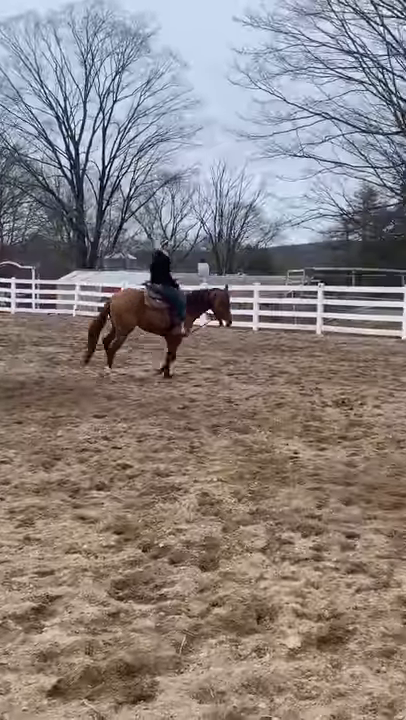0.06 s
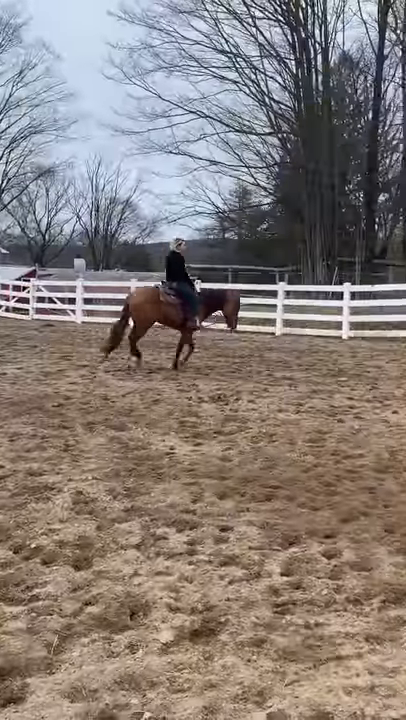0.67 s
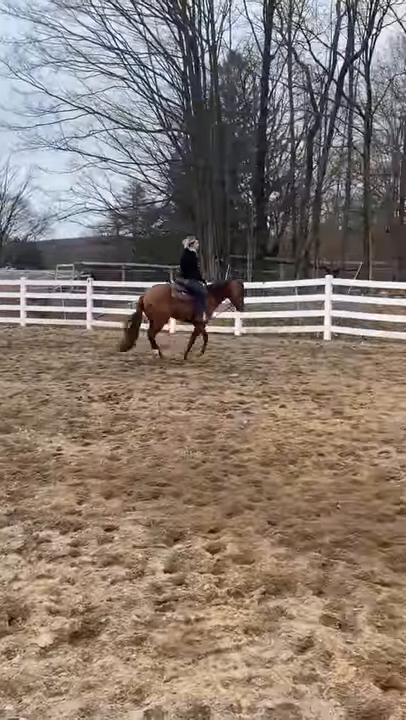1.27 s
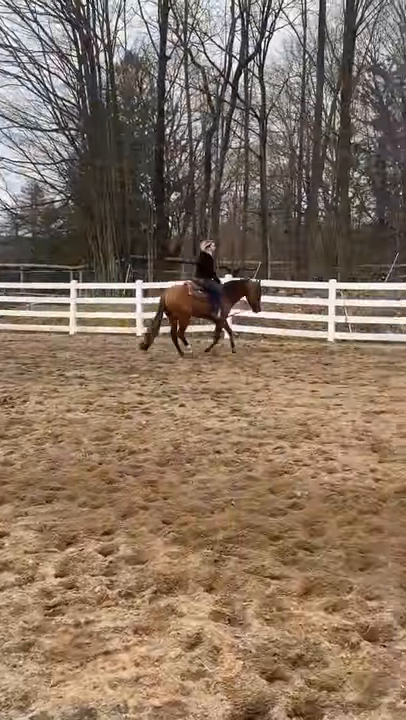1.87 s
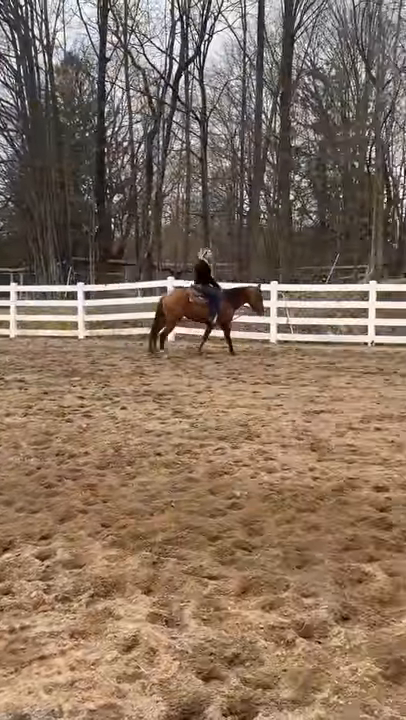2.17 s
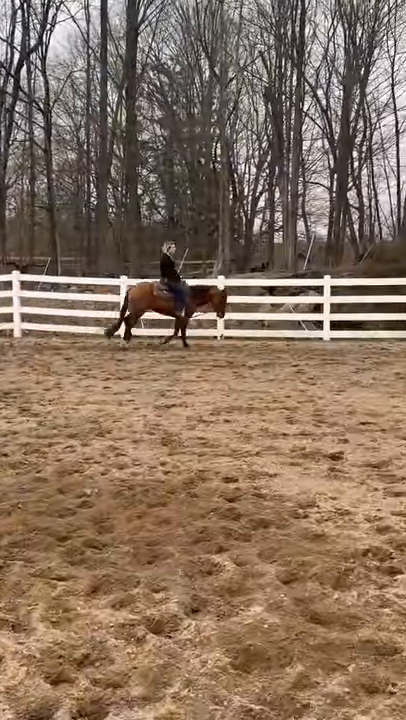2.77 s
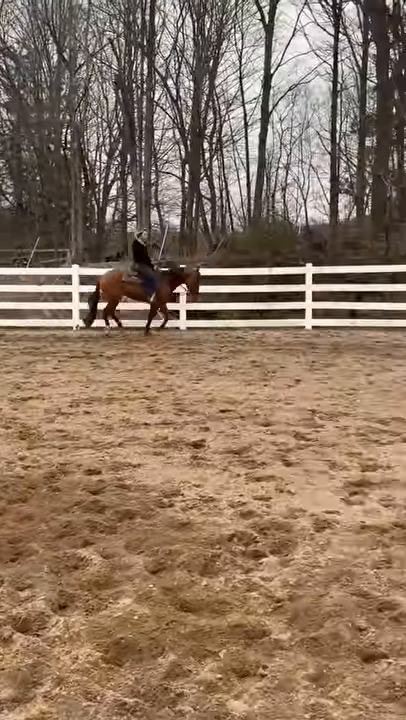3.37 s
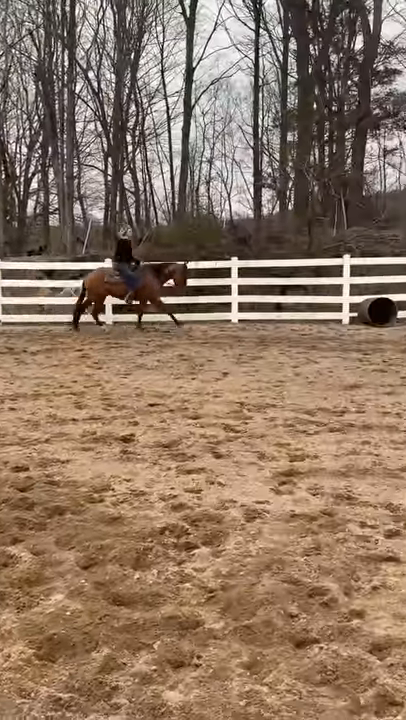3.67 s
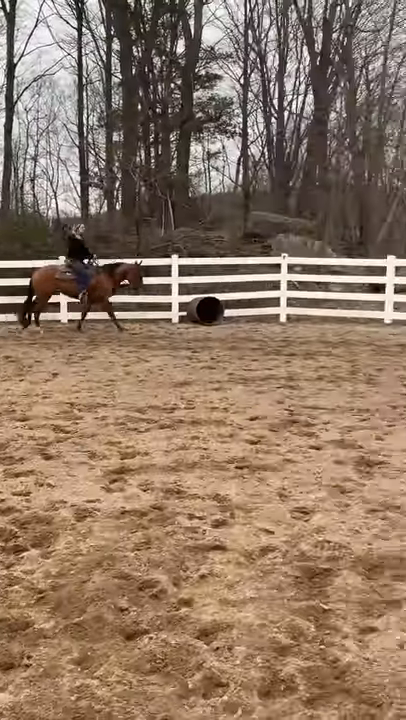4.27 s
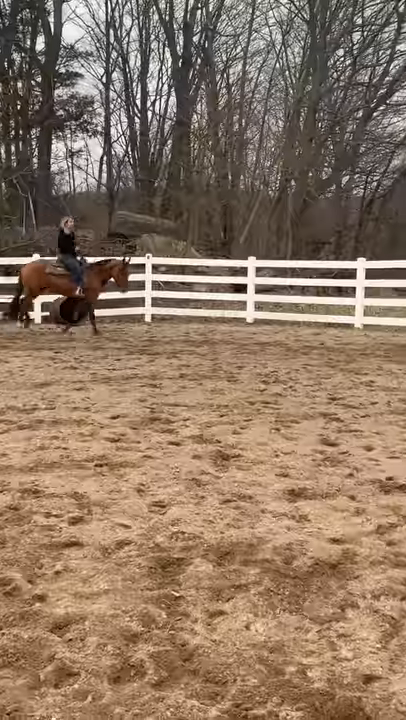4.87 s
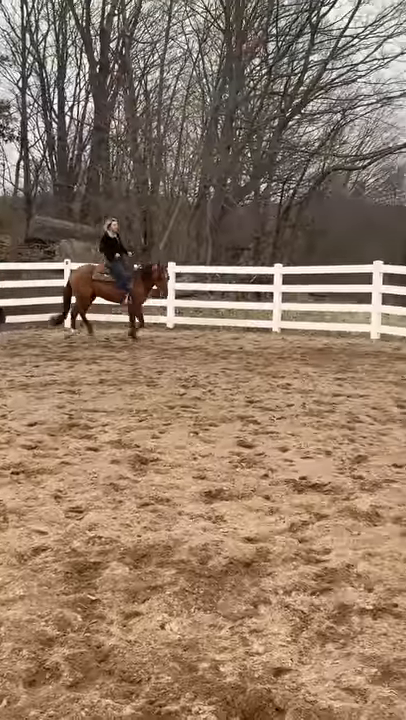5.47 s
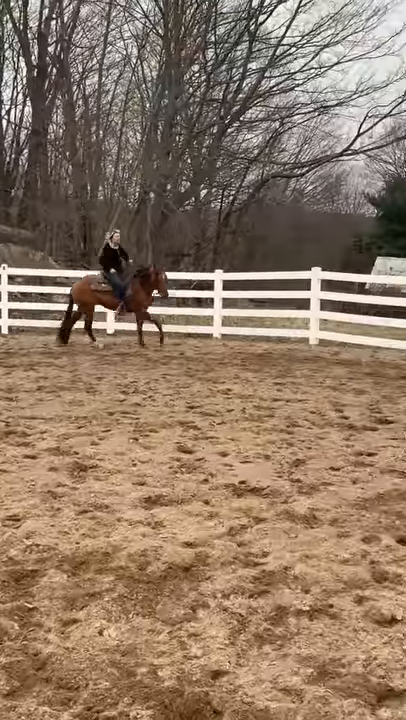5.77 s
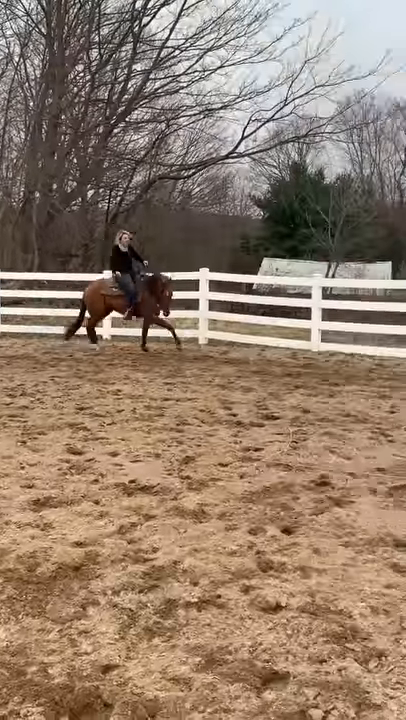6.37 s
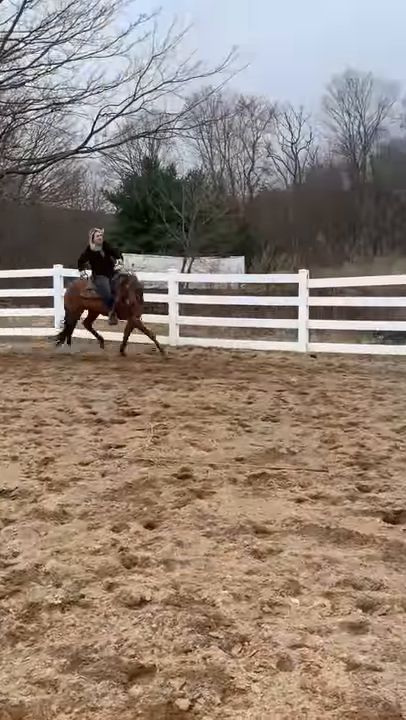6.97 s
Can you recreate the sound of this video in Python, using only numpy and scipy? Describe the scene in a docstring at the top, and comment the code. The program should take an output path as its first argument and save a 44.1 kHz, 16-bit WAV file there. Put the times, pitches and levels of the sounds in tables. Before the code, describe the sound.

A deep, throbbing engine hum idles steadily over the faint, dull hoofbeats of a horse loping on sand, with light clothing ticks.

```python
"""Loping horse and idling engine

A horse lopes on soft sand across an outdoor arena: its impacts give dull thuds, small knocks, thin clinks of
steel and sprays of sand. The uneven firing of an unseen eight-cylinder engine makes a deep throbbing hum whose
balance shifts as the microphone turns. Close by, clothing and its fittings tick, chink and rustle; a light
breeze and distant air lie underneath."""
import sys
import numpy as np
from scipy import signal
from scipy.fft import rfft, irfft, next_fast_len
from scipy.io import wavfile
from scipy.ndimage import uniform_filter1d, map_coordinates

SR = 44100
rng = np.random.default_rng(int(sys.argv[2]) if len(sys.argv) > 2 else 0)


def master_out(mix):
    """Clip the mix to full scale and print it as 16-bit PCM to the path in sys.argv[1]."""
    frames = np.transpose(np.atleast_2d(mix))
    ceiling = np.clip(frames, -1, 1)
    pcm = np.round(ceiling * 32767).astype(np.int16)
    wavfile.write(sys.argv[1], SR, pcm)


N = 309141

# the heaviest hoof of each stride, about two a second:
# (time [s], thud level [dB], its sand [dB], sand of the next hoof [dB], patter length [s])
STRIDES = [(0.412, -25, -62.5, -76.5, .2), (0.968, -50, -68.5, -73, 0.21), (1.5, -47, -78.5, -77, 0.23),
           (2.028, -50, -71.5, -79, 0.29), (2.568, -17, -65.5, -70.5, 0.29), (3.112, -23.5, -67, -89, 0.19),
           (3.627, -15.5, -64, -75.5, 0.3), (4.151, -14, -67.5, -76, 0.31), (4.686, -47, -72.5, -72, 0.29),
           (5.244, -19.5, -61.5, -71.5, 0.2), (5.754, -20, -70.5, -73.5, 0.44), (6.182, -38, -72, -72, 0.3),
           (6.687, -26, -70.5, -61, 0.45)]
# hooves on firm ground: (time [s], body peak [dB], clack peak [dB], grit level [dB], body t60 [s])
KNOCKS = [(0.4495, -41.5, -63, -55, .025), (0.968, -42, -57, -63, .03), (2.481, -44, -68, -76, 0.025),
          (2.5899, -37, -56, -54, 0.048), (2.643, -45.5, -67, -76, 0.041), (3.1136, -35, -55, -55.5, 0.026),
          (3.147, -41.5, -54, -59, 0.045), (3.161, -40, -54.5, -63, 0.026), (4.186, -36, -50, -71, 0.029),
          (4.688, -40, -55, -67.5, 0.029), (5.248, -31.5, -51, -53.5, 0.041),
          (5.595, -41.5, -49, -67.5, 0.039), (5.756, -43, -61, -70, 0.066),
          (6.182, -39.5, -46.5, -60, 0.037), (6.407, -41, -50, -58, 0.022), (6.429, -38, -53, -57, 0.057),
          (6.687, -35.5, -48.5, -68, 0.036), (6.849, -63, -49.5, -63, 0.033), (6.957, -40, -66, -57, .025)]
# modes of a knock's dull body and of the hoof's hard rim: (frequency [Hz], level [dB])
BODY_MODES = [(570, -1), (690, -1.5), (820, 1), (1000, -5), (1220, -3), (1560, -2), (1950, -4.5)]
RIM_MODES = [(2060, -6.5), (2370, -0.5), (2680, 2.5), (3900, -7.5)]
# modes of the steel: (frequency [Hz], level [dB], t60 [s])
STEEL_MODES = [(3960, 1, 0.15), (5030, -8, 0.11), (6700, -12.5, 0.12), (10500, -5.5, 0.14),
               (11530, -1, 0.058), (14430, -12, .13)]
# footfalls that ring the steel: (time [s], level [dB])
STEEL_CLINKS = [(2.5887, -57.5), (3.114, -57), (4.1864, -68), (5.5962, -64), (6.183, -60), (6.6857, -61)]

# engine speed: (time [s], four-stroke cycle rate [Hz])
CYCLE_RATE = [(0, 6.76), (1, 6.865), (2.4, 6.899), (2.8, 6.816), (3.8, 7.051), (4.4, 6.98), (5.4, 7.118),
              (6.7, 7.087), (7, 7.111)]
# arrival of an engine cycle over each of two paths: (first path [s], second path [s])
CYCLE_ARRIVALS = [.103, .058]
# exhaust lines: (order [multiple of the cycle rate], first path level [dB], second path level [dB])
EXHAUST_LINES = [(7, -57, -57), (9, -49, -52), (10, -58, -54), (11, -58, -55), (12, -40, -52),
                 (13, -33, -48), (14, -50, -47), (15, -35, -40.5), (16, -29.7, -34), (17, -47, -49),
                 (18, -57, -60), (19, -56, -64), (22, -65, -53), (23, -53, -53), (24, -63, -62),
                 (25, -59, -60), (26, -60, -57)]
# the microphone turns between the paths: (time [s], second path over first [dB], hum gain [dB])
MICROPHONE_TURN = [(0, -34.5, 4), (2.6, -21, 3.5), (3.2, -12.5, 0.5), (3.5, -0.5, 2), (3.75, 21, 3),
                   (4.1, 11, 0), (4.52, 33, 7), (4.7, 10, 1.5), (7, 26.5, 4.5)]

# clear ticks of clothing and straps: (time [s], level [dB], pitch [Hz], half width [octaves], t60 [s])
CLOTH_TICKS = [(0.197, -57, 10700, 1.6, .025), (0.2377, -55, 10600, .2, 0.017),
               (0.334, -66, 11500, .6, .025), (0.3713, -41.5, 10200, 0.28, .013),
               (0.4505, -46.5, 6000, 2.9, 0.016), (0.4672, -48, 5600, 1.1, .012),
               (0.619, -48, 6400, 0.2, 0.01), (0.738, -60.5, 7000, 2, 0.018),
               (0.85, -53.5, 10100, 0.21, 0.037), (1.0065, -48, 6300, .5, .014),
               (1.04, -62.5, 6100, 0.12, 0.037), (1.288, -57, 5800, .9, 0.013),
               (1.366, -56, 6200, 0.58, .025), (1.697, -49.5, 6500, .5, .01),
               (1.8165, -51, 11500, 1.2, .008), (1.839, -45.5, 8000, 1.3, .009),
               (1.8527, -38, 6400, .55, 0.0047), (2.117, -50.5, 6900, 0.23, 0.0073),
               (2.209, -50, 5000, .7, 0.0072), (2.405, -64.5, 10500, .12, .025),
               (2.849, -57.5, 6000, 1.4, 0.0089), (3.2668, -52, 7500, 1.4, 0.023),
               (3.539, -58, 13500, 0.47, 0.026), (3.636, -60, 6400, .2, .018),
               (4.167, -52, 4400, .35, 0.02), (4.178, -49.5, 6630, 0.31, 0.0098),
               (4.31, -66, 5200, 0.22, 0.029), (4.387, -58, 9300, .4, 0.015),
               (4.908, -61, 3500, 0.42, 0.014), (5.0755, -57.5, 10450, .9, .025),
               (5.223, -53, 4000, 0.21, .022), (5.2825, -48, 6500, 0.67, 0.0084),
               (6.046, -61, 6000, 0.8, .01), (6.1275, -54, 5500, 1.2, 0.011), (6.184, -47, 9000, 1.1, .01),
               (6.3675, -57, 5000, 1.2, .015), (6.381, -56, 7000, 1, .015), (6.6865, -51, 5800, 1.2, 0.017),
               (6.8, -57, 6360, 1, 0.039), (6.875, -53, 7000, 1.2, .014), (6.956, -53, 5660, 0.39, .018)]
# rubs of cloth and scrapes of a sleeve: (time [s], level [dB], length [s])
CLOTH_RUBS = [(.245, -68, 0.18), (.47, -71, 0.17), (.83, -64, 0.029), (1.01, -75.5, 0.1),
              (1.355, -65, 0.05), (1.835, -61, 0.093), (4.17, -76, 0.046), (6.368, -59.5, 0.032),
              (5.027, -74, 0.054), (6.85, -68, 0.13)]
SLEEVE_SCRAPES = [(5.873, -47.5, 0.033), (6.5005, -47.5, 0.022)]
# chinks of small metal fittings: (time [s], level [dB], pitch [Hz])
FITTING_CHINKS = [(0.542, -54, 4110), (1.698, -67, 6330), (1.885, -55, 3980), (2.116, -67, 6750),
                  (2.305, -60.5, 4020), (3.965, -61.5, 10300), (4.179, -67, 6800), (5.596, -68, 5030)]

# gusts at the microphone: (time [s], rise [dB], half length [s])
GUSTS = [(4.497, 4, .2), (6.28, 7.5, .2), (6.9, 7, 0.16)]
# the far rush and its hollow note: (time [s], level [dB])
RUSH_LEVEL = [(0.0, -53), (1.05, -53.5), (1.13, -54), (2.79, -54), (3.45, -53.5), (4.02, -55),
              (5.11, -54.5), (5.48, -53), (5.58, -53.5), (7.01, -53.5)]
HOLLOW_NOTE_LEVEL = [(0, -63.5), (1.4, -61), (2.1, -59), (3.1, -61.5), (4.2, -67), (7, -68)]

# noise spectrum of each source: (frequency [Hz], relative spectral density [dB])
GRIT_SPECTRUM = [(900, -18), (2000, -3.5), (2800, -3.5), (4000, 9.5), (5500, -14.5), (7000, -19),
                 (15000, -29)]
SAND_SPECTRUM = [(700, -10), (1600, 4.5), (2800, 4), (4100, 1.5), (5200, -8), (7000, -16), (11000, -15.5),
                 (15500, -31)]
EXHAUST_SPECTRUM = [(40, -21), (62, -11), (80, -6), (105, 2), (135, -8), (170, -8), (210, -16), (270, -21),
                    (400, -29), (700, -68.5)]
CLOTH_SPECTRUM = [(700, -19), (1900, -3), (3000, 0), (5000, -0.5), (6800, -5), (8500, -6.5), (11000, -6),
                  (15000, -18.5)]
SLEEVE_SPECTRUM = [(900, -19), (1600, -9), (2050, 3), (2700, -7), (3600, -12), (5100, 2.5), (5900, -7),
                   (6700, -2.5), (8300, -13), (10000, -9), (12000, -32), (15000, -25)]
BREEZE_SPECTRUM = [(20, -27), (32, -11.5), (46, 0.5), (60, 4.5), (85, -10), (140, -31.5), (300, -75.5)]
AIR_SPECTRUM = [(150, -13.5), (300, -7.5), (460, -7), (600, 2.5), (800, 0), (1100, 0), (1600, -5),
                (2100, -14.5), (3300, -20.5), (4800, -34), (7000, -36.5), (11000, -35), (15500, -50)]
# likeness of left and right in every stereo noise: (frequency [Hz], coherence [ratio])
COHERENCE = [(100, 0.95), (290, 0.97), (450, 0.72), (700, 0.28), (1400, 0.53), (2500, 0.027), (5000, 1),
             (15000, 0.98)]


def hoof_thuds(thud_hz=215, sink=0.38, t60=0.038, attack_s=0.011, gain_db=5):
    """Damped impact: a hoof gives the ground a short push whose pitch sinks as the sand yields."""
    track, t = np.zeros(N), np.arange(SR // 8) / SR
    glide = 1 + sink * (2 * np.exp(-t / 0.011) - 1)
    onset = (1 - np.exp(-t / attack_s)) ** 2
    for (s, db, *_), detune in zip(STRIDES, rng.standard_normal(len(STRIDES))):
        hz = thud_hz * (1 + 0.033 * detune) * glide
        add(track, s, amp(db + gain_db) * onset * decay(t, t60) * np.sin(2 * np.pi * np.cumsum(hz) / SR))
    return track


def hoof_knocks(attack_s=0.00017, grit_t60=0.044, echo_db=-25, echo_t60=0.3):
    """Modal ringing: a woody body and a rim clack, with a crunch of grit the trees reflect faintly."""
    rings, grit_level, t = np.zeros((2, N)), np.zeros(N), np.arange(SR // 6) / SR
    onset = 1 - np.exp(-t / attack_s)  # sand cushions the blow
    crunch = onset * (decay(t, grit_t60) + amp(echo_db) * decay(t, echo_t60))

    def ring(modes, t60, scatter, side_radians):
        """Superposed modes, peak 1: each footfall meets new ground, so pitches and phases vary."""
        hz, mode_db = np.transpose(modes)[:, :, None]
        detune, start, *sides = rng.standard_normal((4, len(hz), 1))
        phase = 2 * np.pi * (hz * (1 + scatter * detune) * t + start) + side_radians * np.array(sides)
        pair = onset * decay(t, t60) * np.sum(amp(mode_db) * np.sin(phase), axis=1)
        return pair / np.abs(pair).max()

    for s, body_db, clack_db, grit_db, body_t60 in KNOCKS:
        body = amp(body_db) * ring(BODY_MODES, body_t60, scatter=0.099, side_radians=0.5)
        clack = amp(clack_db) * ring(RIM_MODES, t60=0.034, scatter=0.027, side_radians=0)
        for side, sound in zip(rings, body + clack):
            add(side, s, sound)
        add(grit_level, s, amp(grit_db) * crunch)
    return rings + grit_level * stereo_noise(GRIT_SPECTRUM)


def sand_sprays(lead_s=0.036, next_hoof_s=0.28, clump_db=3):
    """Granular impacts: two hooves of each stride fling up sand, which patters back in clumps."""
    sprays = []
    for s, _, first_db, next_db, length in STRIDES:
        skim = s - lead_s  # the toe skims the sand before the hoof lands
        sprays += [(skim, first_db, length), (skim + next_hoof_s, next_db, length)]
    grains = stereo_noise(SAND_SPECTRUM, grain_db=9, patchy_db=4)
    return strokes(sprays, rise=0.099, fade_db=7.5) * amp(clump_db * wobble(150)) * grains


def steel_clinks(gain_db=-8, scatter_db=6):
    """Free vibration: steel, likely a horseshoe on grit, rings the same thin notes at some footfalls."""
    track, t = np.zeros(N), np.arange(SR // 4) / SR
    hz, mode_db, t60 = np.transpose(STEEL_MODES)[:, :, None]
    modes = amp(mode_db) * decay(t, t60) * np.sin(2 * np.pi * hz * t)
    for s, db in STEEL_CLINKS:
        excitation = amp(db + gain_db + scatter_db * rng.standard_normal((len(hz), 1)))
        add(track, s, np.sum(excitation * modes, axis=0))
    return track


def engine(rough_db=-44, left_lead_s=0.00016):
    """Two-path interference: the turning microphone crossfades the hum's paths, over rough low noise."""
    rate, = curves(CYCLE_RATE)
    cycles = np.cumsum(rate) / SR
    balance_db, gain_db = curves(MICROPHONE_TURN)
    angle = np.arctan(amp(balance_db))
    paths = zip(CYCLE_ARRIVALS, np.transpose(EXHAUST_LINES)[1:], (np.cos(angle), np.sin(angle)))
    hum = np.zeros(N)
    for arrival, levels_db, weight in paths:
        hum += amp(gain_db) * weight * exhaust_hum(cycles - cycles[round(arrival * SR)], levels_db)
    pair = filtered(hum, lambda hz: np.exp(1j * np.pi * left_lead_s * np.array([hz, -hz])))
    return pair + amp(rough_db) * stereo_noise(EXHAUST_SPECTRUM)


def exhaust_hum(cycles, levels_db, waver_db=1.8, wander_radians=0.21):
    """Beating: uneven firing gives lines at multiples of the cycle rate, whose sum throbs."""
    hum = np.zeros(N)
    for (order, *_), db in zip(EXHAUST_LINES, levels_db):
        # an echo cancels the hum just under the 14th line, and its sign flips across that notch
        sign = 1 if order >= 14 else -1
        # the muffler holds lines back longer the farther they lie from the 14th, which smears each throb
        smear = 0.028 * (order - 14) ** 2
        # weak lines wander most, as no two firings are equal
        drift = wander_radians * amp((max(levels_db) - db) / 2) * wobble(5.4)
        phase = 2 * np.pi * (order * cycles - smear) + drift
        hum += sign * amp(db + waver_db * wobble(2.535)) * np.cos(phase)
    return hum


def cloth_rubs():
    """Friction noise: fibres rub for a moment in a grainy rustle."""
    fibres = amp(2.5 * wobble(200)) * stereo_noise(CLOTH_SPECTRUM, grain_db=6, patchy_db=2.5)
    return strokes(CLOTH_RUBS, rise=0.023, fade_db=12) * fibres


def cloth_ticks(gain_db=-3, tail_db=-20, tail_t60=0.05, crack_db=-11, crack_hz=4300, crack_octaves=0.47):
    """Noise transients: cloth and straps snap, each tick a bright band over a common crack."""
    track, t = np.zeros(N), np.arange(SR // 10) / SR
    band = lambda hz, centre, octaves: resonance(np.log2((hz + 1) / centre), octaves)
    for s, db, pitch_hz, octaves, t60 in CLOTH_TICKS + faint_ticks():
        envelope = decay(t, t60) + amp(tail_db) * decay(t, tail_t60)
        colour = lambda hz: band(hz, pitch_hz, octaves) + amp(crack_db) * band(hz, crack_hz, crack_octaves)
        snap = envelope * filtered(rng.standard_normal(len(t)), colour)
        add(track, s, amp(db + gain_db) * snap * np.linalg.norm(envelope) / np.linalg.norm(snap))
    return track


def faint_ticks(per_second=6, count=64, octaves=0.7, t60=0.013):
    """Poisson process: stray ticks at random moments, as rows like those of CLOTH_TICKS."""
    times = np.cumsum(rng.exponential(size=count)) / per_second
    levels_db = rng.normal(-66.5, 2, count)
    pitches_hz = 7000 * 2 ** rng.normal(0, 0.43, count)
    return [(s, db, hz, octaves, t60) for s, db, hz in zip(times, levels_db, pitches_hz) if s < N / SR]


def fitting_chinks(t60=0.13, attack_s=0.0013, relative_width=0.013):
    """Narrow resonance: small loose metal parts rattle briefly, each around one pitch."""
    track, t = np.zeros(N), np.arange(SR // 8) / SR
    envelope = decay(t, t60) * (1 - np.exp(-t / attack_s))
    for s, db, pitch_hz in FITTING_CHINKS:
        rattle = rng.standard_normal(len(t))
        ring = unit_rms(filtered(rattle, lambda hz: resonance(hz / pitch_hz - 1, relative_width)))
        add(track, s, amp(db) * envelope * ring)
    return track


def sleeve_scrapes():
    """Sliding friction: stiff fabric scrapes close to the microphone with a hollow, zipping colour."""
    envelope = strokes(SLEEVE_SCRAPES, rise=0.041, fade_db=9) * amp(2.3 * wobble(350))
    return envelope * stereo_noise(SLEEVE_SPECTRUM, grain_db=4.5)


def breeze(lull_db=-50, flutter_db=3):
    """Turbulence: moving air rumbles at the microphone and swells in gusts."""
    t = np.arange(N) / SR
    gust_db = sum(db * np.exp(-((t - s) / length) ** 2) for s, db, length in GUSTS)
    return amp(lull_db + gust_db + flutter_db * np.tanh(wobble(7.4))) * stereo_noise(BREEZE_SPECTRUM)


def far_rush(gain_db=-1, swell_db=0.63, note_hz=827, half_width_hz=100):
    """Broadband noise: distant air and roads rush, and one narrow band is heard as a hollow note."""
    rush_db, = curves(RUSH_LEVEL)
    note_db, = curves(HOLLOW_NOTE_LEVEL)
    rush = stereo_noise(AIR_SPECTRUM, patchy_db=2.3)
    note = filtered(stereo_noise(AIR_SPECTRUM), lambda hz: resonance(hz - note_hz, half_width_hz))
    return amp(rush_db + gain_db + swell_db * wobble(3.8)) * rush + amp(note_db) * unit_rms(note)


def stereo_noise(spectrum, grain_db=0, patchy_db=0):
    """Partly coherent noise of rms 1: grain_db makes unequal grains, patchy_db adds short patches."""
    grains = rng.standard_normal((2, N)) * amp(grain_db * np.clip(rng.standard_normal(N), -2.5, 2.5))
    if patchy_db:
        cells = signal.stft(grains, nperseg=1024)[2]
        patches = rng.standard_normal(cells.shape[1:])
        for axis in (0, 1):  # smooth over frequency, then time
            patches = uniform_filter1d(patches, size=3, axis=axis)
        grains = signal.istft(cells * amp(patchy_db * unit_rms(patches)), nperseg=1024)[1][:, :N]

    def mid_and_side(hz):
        """Coherence divides the power between mid and side."""
        angle = np.arccos(np.clip(log_interp(COHERENCE, hz), -1, 1)) / 2
        return amp(log_interp(spectrum, hz)) * [np.cos(angle), np.sin(angle)]

    mid, side = filtered(grains, mid_and_side)
    return unit_rms(np.array([mid + side, mid - side]))


def strokes(rows, rise, fade_db):
    """Envelope of (time [s], level [dB], length [s]) strokes; rise is a share of the length."""
    envelope = np.zeros(N)
    for s, db, length in rows:
        progress = np.arange(int(2 * length * SR)) / (length * SR)
        add(envelope, s, amp(db - fade_db * progress ** 2) * (1 - np.exp(-progress / rise)))
    return envelope


def amp(db):
    """Amplitude ratio of a level in decibels."""
    return 10 ** (np.asarray(db) / 20)


def decay(t, t60):
    """Exponential damping: 60 dB in t60 seconds."""
    return amp(-60 * t / t60)


def resonance(offset, half_width):
    """Lorentzian peak: 1 at the centre, a half at half_width."""
    return 1 / (1 + (offset / half_width) ** 2)


def unit_rms(x):
    """Normalisation to rms 1."""
    return x / np.sqrt(np.mean(x ** 2) + 1e-20)


def log_interp(points, hz):
    """Interpolation of (frequency [Hz], value) points on a log axis."""
    frequencies, values = np.transpose(points)
    return np.interp(np.log(hz + 1), np.log(frequencies + 1), values)


def curves(rows):
    """Linear interpolation: one value per sample for each column after the time."""
    times, *columns = np.transpose(rows)
    return [np.interp(np.arange(N) / SR, times, column) for column in columns]


def wobble(rate):
    """Random modulation: a smooth curve with rate knots a second."""
    knots = rng.standard_normal(512)
    coarse = np.arange(0, N + 64, 64)
    return np.interp(np.arange(N), coarse, map_coordinates(knots, [coarse * rate / SR], mode="mirror"))


def filtered(x, response):
    """Linear filtering: the spectrum of x times a frequency response."""
    size = next_fast_len(x.shape[-1] + SR // 8)
    return irfft(rfft(x, size) * response(np.fft.rfftfreq(size, 1 / SR)), size)[..., :x.shape[-1]]


def add(track, s, sound):
    """Superposition of a sound on a track at s seconds."""
    part = track[max(round(s * SR), 0):][:len(sound)]
    part += sound[:len(part)]


def scene():
    """Superposition: engine and thuds lie just right of centre; air and sand are wide."""
    centre = (engine() + hoof_thuds()) * amp([[-0.25], [0.25]])
    background = breeze() + far_rush()
    ground = hoof_knocks() + sand_sprays()
    cloth = cloth_rubs() + cloth_ticks()
    metal = fitting_chinks() + steel_clinks()
    return centre + background + ground + cloth + metal + sleeve_scrapes()


def record(dry, lag_s=0.0002223, split_hz=2200, top_hz=15800):
    """Phase difference: the recorder's processing pulls the treble of the two channels apart, below a steep
    band limit."""
    half_phase = lambda hz: np.pi * lag_s * np.maximum(hz - split_hz, 0)
    low_pass = lambda hz: 1 / (1 + (hz / top_hz) ** 100)
    return filtered(dry, lambda hz: np.exp(1j * half_phase(hz) * [[1], [-1]]) * low_pass(hz))


dry = scene()
out = record(dry)
master_out(out)
```